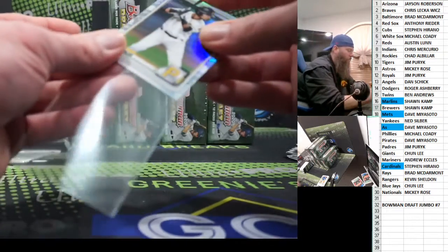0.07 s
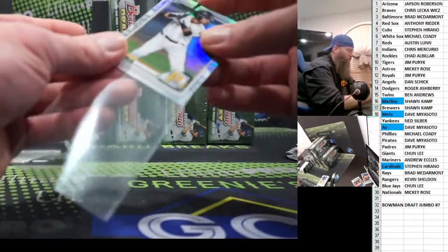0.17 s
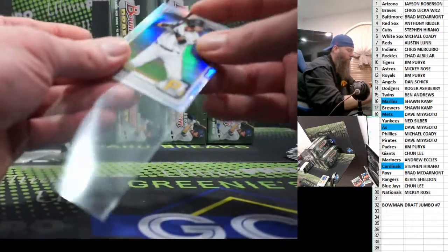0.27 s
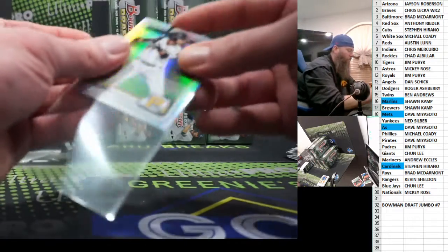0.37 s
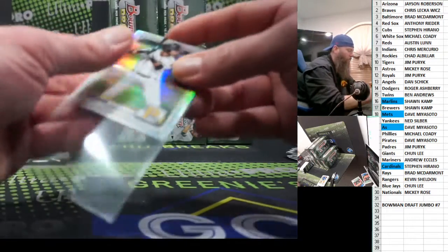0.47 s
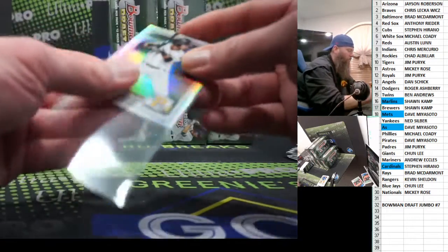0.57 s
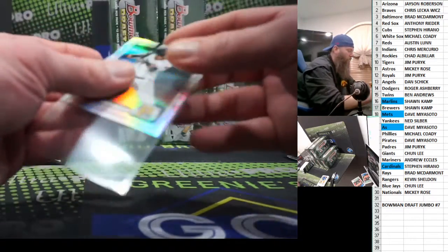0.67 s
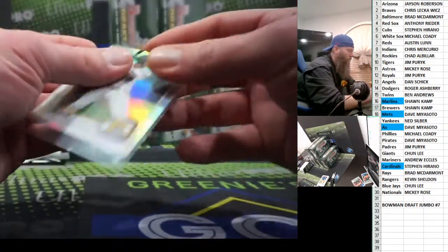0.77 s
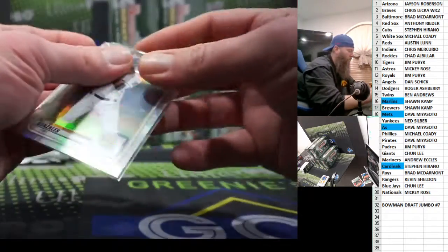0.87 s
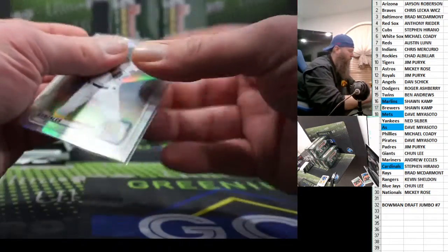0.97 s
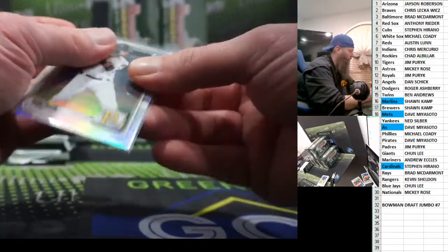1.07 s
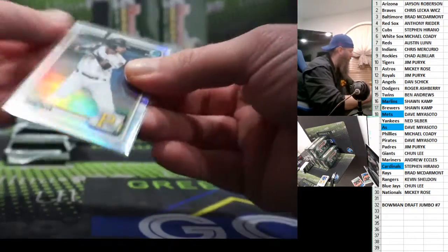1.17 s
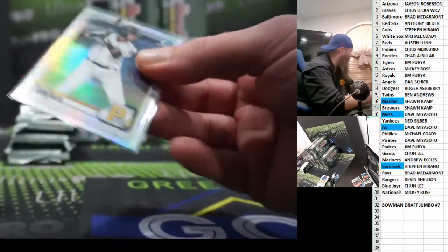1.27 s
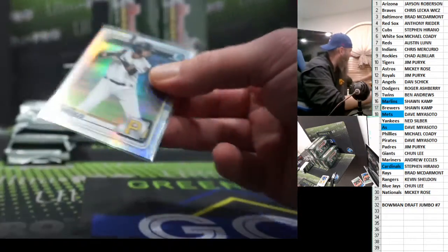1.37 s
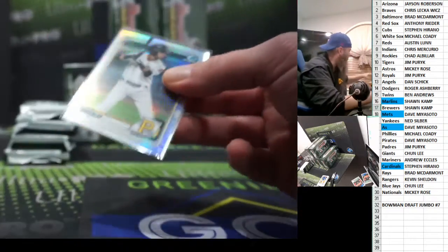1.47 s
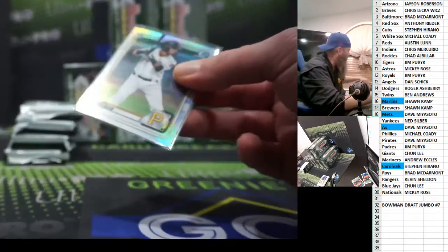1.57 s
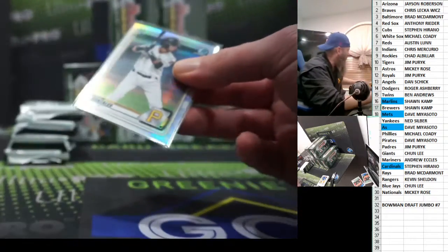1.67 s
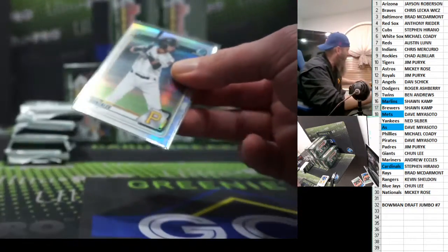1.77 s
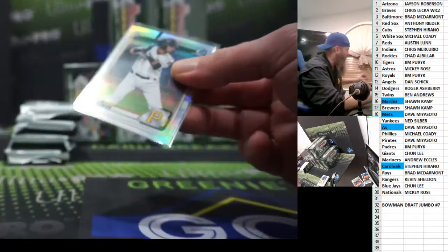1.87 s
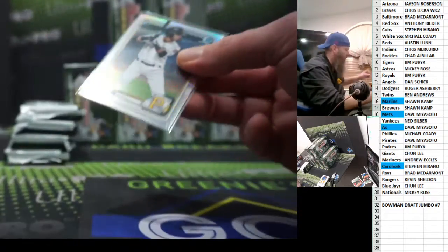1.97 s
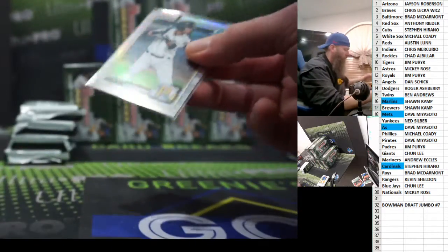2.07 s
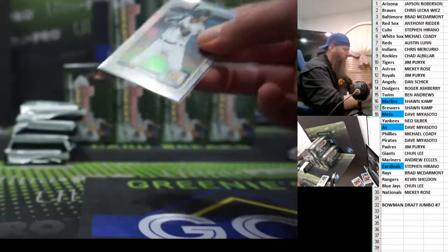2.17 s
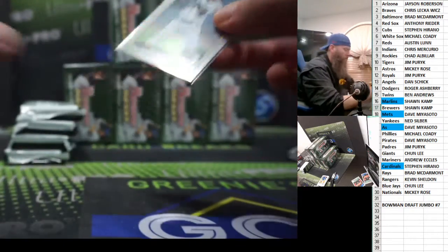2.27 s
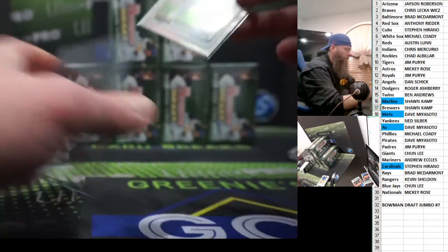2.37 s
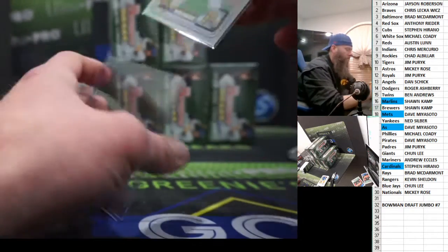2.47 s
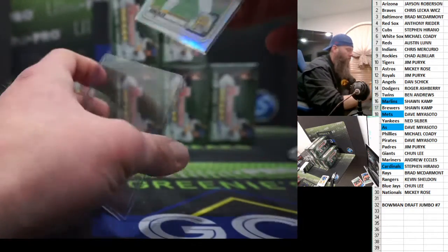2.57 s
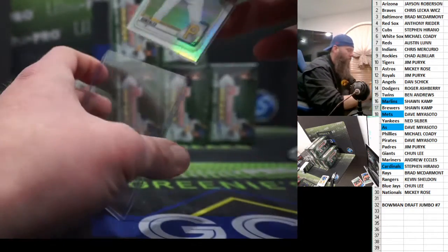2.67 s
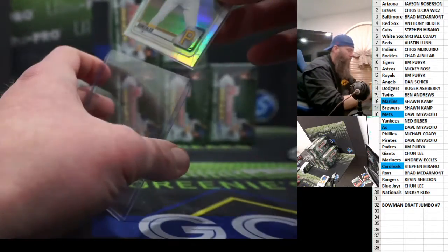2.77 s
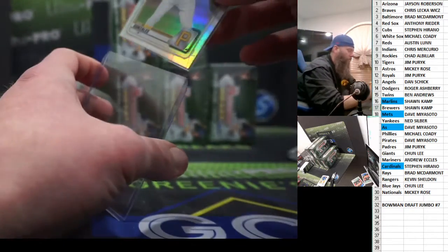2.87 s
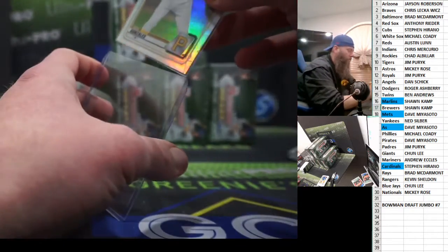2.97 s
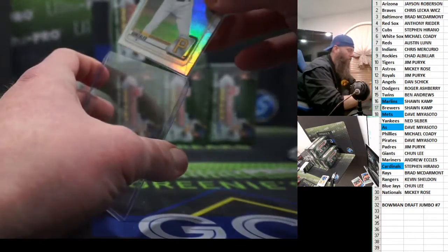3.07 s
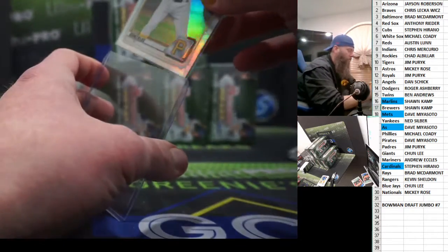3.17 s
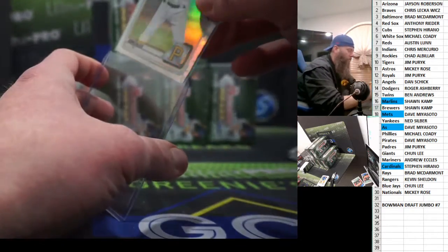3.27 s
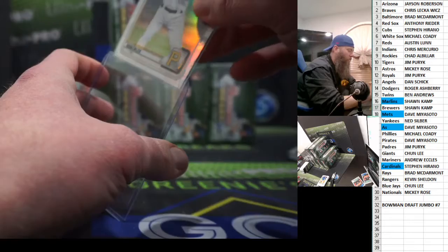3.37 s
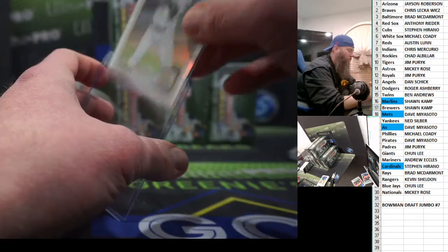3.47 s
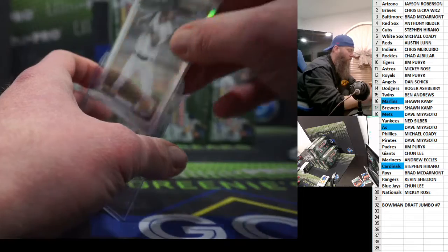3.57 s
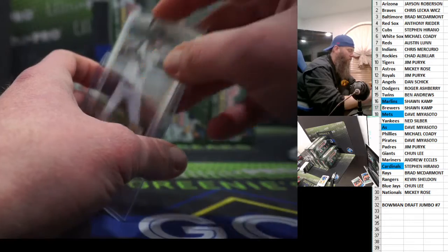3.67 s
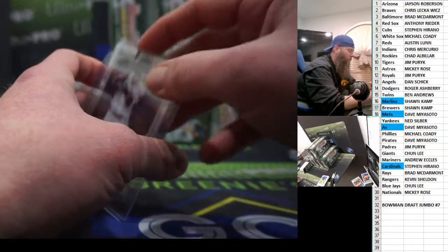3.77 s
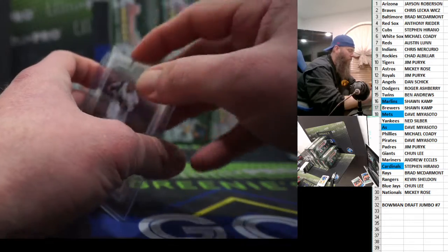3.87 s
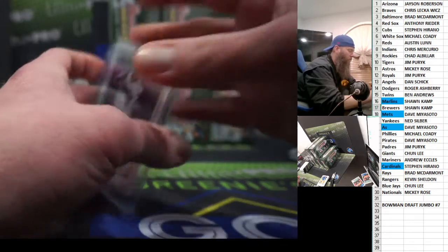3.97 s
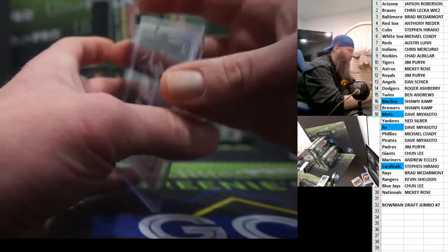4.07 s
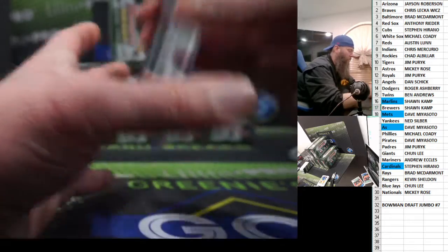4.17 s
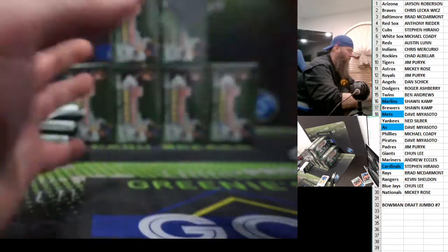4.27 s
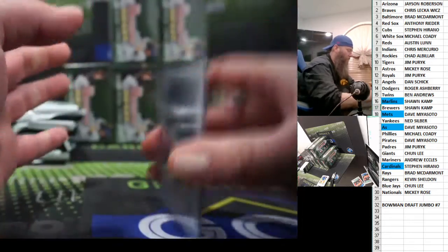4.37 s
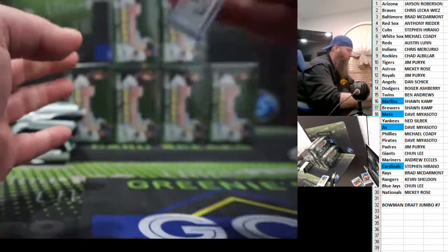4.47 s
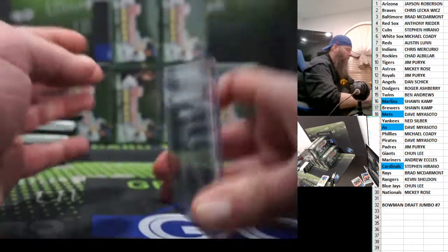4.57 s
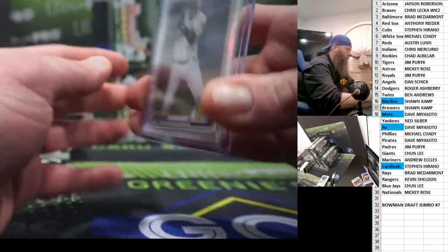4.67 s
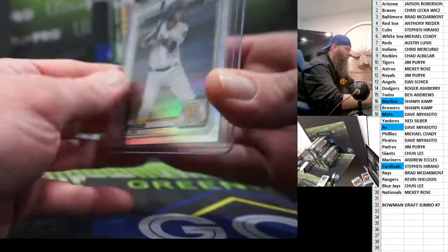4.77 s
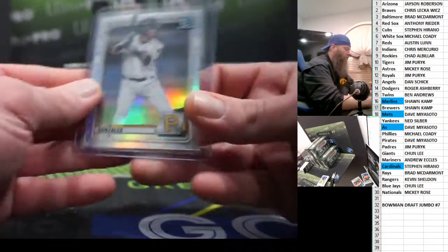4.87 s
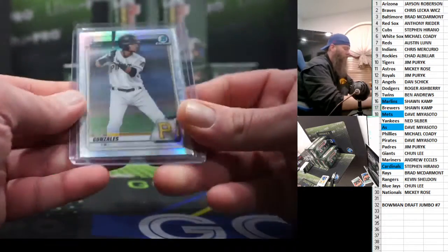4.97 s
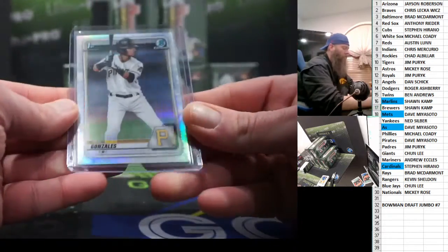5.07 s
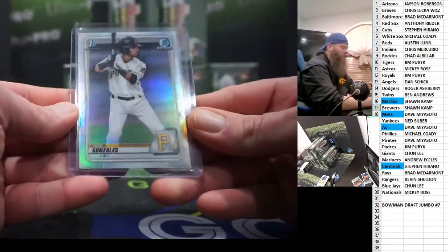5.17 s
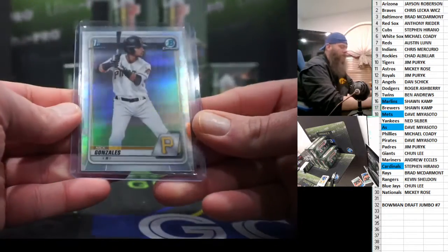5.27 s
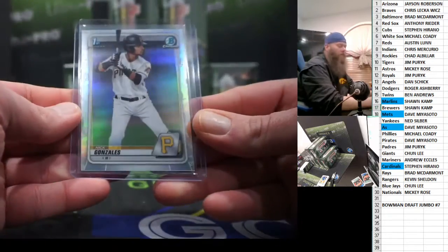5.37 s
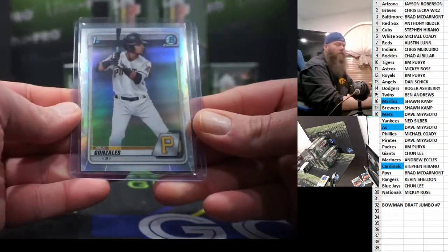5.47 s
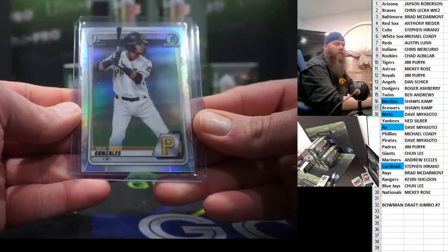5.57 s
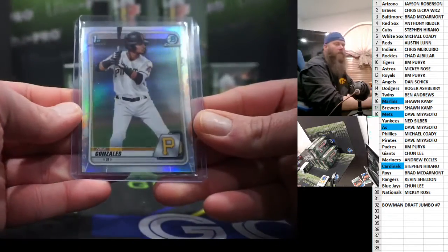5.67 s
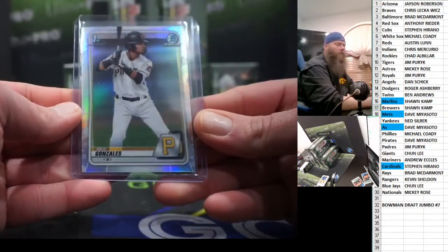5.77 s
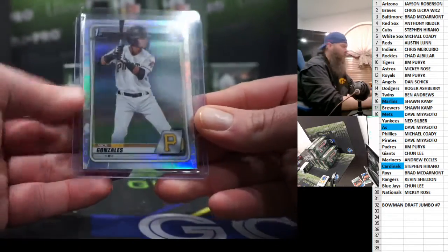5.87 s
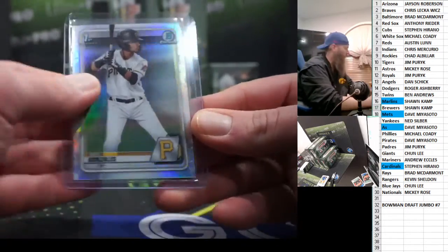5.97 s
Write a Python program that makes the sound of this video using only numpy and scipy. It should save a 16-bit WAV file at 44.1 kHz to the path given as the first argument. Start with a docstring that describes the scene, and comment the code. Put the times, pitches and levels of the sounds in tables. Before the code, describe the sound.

Close to a desk microphone in a small, quiet room, a trading card slides into a soft plastic sleeve with faint hisses and a couple of crisp little snaps. Fingers rub and bump the plastic, and a small click follows as the card goes into a rigid holder. The holder is then rapped twice in quick succession on a padded table, by far the loudest sound, ringing briefly in the room. Faint handling follows.

```python
"""Soft plastic film hisses and snaps as a trading card slides into a sleeve, then into a rigid holder,
close to a desk microphone in a small room. Fingers rub and bump the plastic. Then, loudest of all,
the holder's edge is rapped twice on the padded table to seat the card, and the room rings briefly.
Every movement shakes the microphone stand a little."""
import sys
import numpy as np
from scipy import signal
from scipy.fft import rfft, irfft, next_fast_len
from scipy.io import wavfile
from scipy.ndimage import uniform_filter1d

SR = 44100
rng = np.random.default_rng(int(sys.argv[2]) if len(sys.argv) > 2 else 0)


def unload_wav(signal):
    """Save mono or channel-first audio to the path in sys.argv[1] as 16-bit WAV at rate SR, clipped to [-1, 1]."""
    wavfile.write(
        sys.argv[1],
        SR,
        np.round(np.clip(np.atleast_2d(signal).T, -1, 1) * 32767).astype(np.int16),
    )


N = 264820
TIME = np.arange(N) / SR

# raps on the table, close to the microphone:
# (time [s], knock gain [dB], crack peak [dB], thud gain [dB], stand sway gain [dB])
RAPS = [(4.3359, 0.5, -21, -42, -26.5), (4.5415, 0.5, -20, -23, -19.5)]
# modes of the table and holder: (frequency [Hz], relative level [dB], t60 [s])
TABLE_MODES = [(477.3, -14, 0.022), (536, -20.5, 0.082), (638, -23, 0.0053), (770.7, -20, 0.14),
               (1060, -1.32, 0.0075), (1452, -17.5, 0.033), (1550, -15.5, 0.018), (2064, -30.5, 0.031)]
# the holder's plastic crack: (frequency [Hz], relative level [dB])
CRACK_SPECTRUM = [(1500, -13.5), (2250, -8), (2600, 5), (3000, 5.5), (3550, -3), (4150, 6), (4900, -0.5),
                  (5450, 4.5), (6200, -3.5), (8100, -2), (9900, -7), (11500, -13.5), (13000, -13),
                  (16000, -23.5)]
# reflections off surfaces beside the microphone: (delay [s], gain [dB])
NEAR_ECHOES = [(.0039, -8), (.00765, -13)]
def holder_raps(thud_hz=120, thud_t60=0.14, mat_hz=2200, crack_lag_s=0.00082, crack_t60=0.013,
                crack_echo_db=-8):
    """The holder's edge hits the mat: a dead knock, a thud and a crack, mirrored by near surfaces."""
    knock, crack = np.zeros(N), np.zeros(N)
    body = sum((-1) ** (k + 1) * from_db(db) * ring(hz, t60)
               for k, (hz, db, t60) in enumerate(TABLE_MODES))
    mat = signal.butter(4, mat_hz, fs=SR, output="sos")   # the mat softens the blow
    for s, knock_db, crack_db, thud_db, _ in RAPS:
        blow = from_db(knock_db) * body + from_db(thud_db) * ring(thud_hz, thud_t60)
        add(knock, s, signal.sosfilt(mat, blow))
        add(crack, s + crack_lag_s, from_db(crack_db) * click(crack_t60, CRACK_SPECTRUM))
    out = knock + crack
    for delay, db in NEAR_ECHOES:
        add(out, delay, -from_db(db) * (knock + from_db(crack_echo_db) * crack))
    return out


# snaps of the sleeve, close up: (time [s], peak level [dB], tilt [dB/octave])
FILM_SNAPS = [(0.2646, -48.5, -0.5), (0.8216, -45.5, 1.5), (0.8432, -36.5, 0), (.8522, -48, 8),
              (.919, -36, 1.9), (1.052, -56, -4), (1.655, -57.5, -4), (2.2889, -55, -5.5),
              (2.397, -57, -6.5), (2.441, -54.5, -5), (2.5626, -57.5, -7), (3.0918, -45, 0.5),
              (3.9235, -54, 1), (3.9314, -54, -7), (4.748, -50, 6), (5.967, -56, 0)]
# a snap before its tilt: (frequency [Hz], relative level [dB])
SNAP_SPECTRUM = [(400, -12), (1100, -11), (1600, -1), (2000, 2.5), (2450, -9.5), (3500, -6.5), (4400, 2.5),
                 (5300, 2), (6000, -3), (8100, 4.5), (11000, -4), (12800, -10.5), (16000, -2)]
def film_snaps(snap_t60=0.0091, shiver_t60=0.13, shiver_db=-14):
    """Card corners catch and the film snaps, then shivers on faintly."""
    out = np.zeros(N)
    for s, db, tilt in FILM_SNAPS:
        spectrum = [(hz, level + tilt * np.log2(hz / SR)) for hz, level in SNAP_SPECTRUM]
        snap = click(snap_t60, spectrum)
        shiver = from_db(shiver_db) * click(shiver_t60, spectrum)
        add(out, s, from_db(db) * (snap + shiver))
    return out


# pushes of the card, close up: (start [s], length [s], final level [dB], top treble gain [dB])
PUSHES = [(0.25, 0.085, -71, -1), (0.344, 0.075, -76, 4), (0.592, 0.21, -72, 3), (0.81, 0.059, -64, -3),
          (1.084, 0.11, -76, 8.5), (2.14, 0.066, -66.5, -3), (2.412, 0.041, -76, 7),
          (2.524, 0.045, -73.5, -8), (2.623, 0.061, -80.5, 1), (2.749, 0.027, -76.5, 0.5),
          (2.8, .025, -80, -2), (2.852, 0.047, -85, 5), (3.13, 0.1, -76.5, -14), (3.382, 0.15, -71.5, 2.5),
          (3.521, 0.3, -67, 3), (3.953, 0.06, -70, -3), (4.76, .22, -79.5, -12), (5.148, 0.089, -81, -2.5),
          (5.899, 0.1, -70, -3)]
# card sliding on film: (frequency [Hz], relative level [dB])
SLIDE_SPECTRUM = [(900, -18), (1500, -10), (2000, -5), (2600, -9.5), (3600, -10.5), (4400, -1.5),
                  (6100, -5), (8100, -1.5), (10600, -7), (14500, -6), (16000, -2)]
def card_slide(crossover_hz=9500):
    """Each push makes the card hiss along the film; each push has its own share of high treble."""
    speed, sheen = np.zeros(N), np.zeros(N)
    for start, length, db, treble_db in PUSHES:
        stroke = from_db(db) * push(start, length)
        speed += stroke
        sheen += stroke * from_db(treble_db)
    out = np.zeros(N)
    for envelope, side in ((speed, "low"), (sheen, "high")):
        crossover = signal.butter(2, crossover_hz, side, fs=SR, output="sos")
        hiss = friction(SLIDE_SPECTRUM, grain_db=3.5, flutter_db=2.0)
        out += envelope * signal.sosfilt(crossover, hiss)
    return out


def push(start, length, attack_s=0.0066, ease_share=.3, swell_db_per_s=30, release_s=0.016):
    """Envelope of a push that takes hold, gathers speed and lets go; longer ones start more gently."""
    since, past = TIME - start, TIME - start - length
    attack = np.clip(since / (attack_s + ease_share * length), 0, 1)
    swell = from_db(swell_db_per_s * np.minimum(past, 0))
    return attack * swell * np.exp(-np.clip(past / release_s, 0, 20))


def pocket(hiss, round_trip_s=.00023, reflection=0.31, wander=0.19):
    """The gap between the sheets resonates, its pitch wandering at random."""
    lag = round_trip_s * np.exp(wander * drift(10.0))
    return (hiss + reflection * np.interp(TIME - lag, TIME, hiss)) / np.hypot(1, reflection)


# bumps at the desk, near the microphone: (time [s], peak level [dB], frequency [Hz])
HAND_BUMPS = [(0.844, -53, 1260), (.848, -64, 131), (0.859, -47, 52), (1.044, -54, 163), (1.05, -52, 75.5),
              (1.051, -67, 786), (1.098, -63.5, 480), (1.569, -61.5, 547), (1.653, -69, 480),
              (2.074, -58, 680), (2.075, -53, 1060), (2.315, -62.5, 480), (3.093, -63.5, 405),
              (3.092, -53, 884), (3.78, -63.5, 1110), (5.921, -62, 900)]
def bumps(t60_cycles=13):
    """Fingers and card edges bump the plastic, and hands bump the table."""
    return touches([(s, db, hz, t60_cycles / hz) for s, db, hz in HAND_BUMPS], octaves=0.67)


# squeaks and ticks, close up: (time [s], peak level [dB], frequency [Hz], t60 [s])
PLASTIC_SQUEAKS = [(1.7965, -61, 3400, 0.15), (3.092, -41, 13000, 0.009), (3.8, -66, 1820, .07),
                   (4.059, -60, 1810, 0.017), (4.06, -65.5, 8000, .05), (4.097, -64.5, 1800, 0.043),
                   (4.768, -63.5, 5750, 0.04), (4.796, -60, 5700, 0.035), (4.8, -63.5, 7760, 0.049),
                   (5.6457, -76, 4610, 0.021)]
def squeaks():
    """The plastic sticks and slips in short squeaks and high ticks."""
    return touches(PLASTIC_SQUEAKS, octaves=0.29)


# grip while sleeving, seating and showing the card: (time [s], firmness [dB])
SLEEVING_GRIP = [(0.0, -85.5), (0.77, -84.5), (0.96, -80), (1.49, -81.5), (2.0, -82), (2.23, -77.5),
                 (2.37, -78.5), (2.53, -80.5), (2.72, -83.5), (3.28, -86), (3.89, -82)]
SEATING_GRIP = [(3.98, -80), (4.13, -79.5), (4.3, -77)]
SHOWING_GRIP = [(5.0, -80), (5.11, -83), (5.816, -86.5), (5.98, -76.5)]
def grip(db, follows, light_grip_db=-80.5):
    """Gain of a layer: `db` at a light grip, rising `follows` dB for each dB of firmer grip."""
    times, firmness = np.vstack([SLEEVING_GRIP, SEATING_GRIP, SHOWING_GRIP]).T
    return from_db(db + follows * (np.interp(TIME, times, firmness) - light_grip_db))


# skin on plastic, close up: (frequency [Hz], relative level [dB])
RUB_SPECTRUM = [(120, -9.5), (200, -4.5), (440, 1), (750, -3), (1250, 5), (1700, -5.5), (2100, -2),
                (2700, -10), (4900, -16), (8000, -15.5), (11000, -31.5)]
def finger_rub():
    """Fingertips rub the outside of the plastic, louder under a firm grip."""
    return grip(db=-79, follows=1.5) * friction(RUB_SPECTRUM, grain_db=3.0, flutter_db=2.0)


# film flexing in the hand, close up: (frequency [Hz], relative level [dB])
FLEX_SPECTRUM = [(1500, -10.5), (3000, -3.5), (4500, -2), (8000, -5), (11000, -7), (16000, -10)]
def film_rustle():
    """The grip flexes the film into a fine rustle."""
    return grip(db=-82.5, follows=2.2) * friction(FLEX_SPECTRUM, grain_db=2.5, flutter_db=3.0)


def film_crinkles(per_s=14, spread_db=3, t60=.006):
    """The film clicks at random under the fingers, louder under a firm grip."""
    sizes = from_db(spread_db * np.minimum(rng.exponential(1, N), 3))
    impulses = sizes * (rng.random(N) < per_s / SR) * grip(db=-71.5, follows=2.2)
    return signal.fftconvolve(impulses, click(t60, FLEX_SPECTRUM))[:N]


# the hands jolt the microphone stand: (time [s], sway gain [dB])
STAND_JOLTS = [(.79, -42), (1.01, -27.5), (3.9, -40.5), (5.72, -37.5)]
# handling felt through the stand: (frequency [Hz], relative level [dB])
RUMBLE_SPECTRUM = [(12, 6), (20, 6), (30, -16.5), (45, -22), (70, -43), (120, -48), (250, -74)]
def microphone_stand(sway_hz=20.0, sway_t60=0.99, sway_lag_s=.02, build_up_s=.04):
    """The stand rumbles with the handling and swings after each jolt and rap."""
    rumble = colour(band(rng.standard_normal(N), 15, 300), RUMBLE_SPECTRUM)
    out = grip(db=-50, follows=1.1) * rms_one(rumble)
    build_up = 1 - np.exp(-(TIME[:SR] / build_up_s) ** 2)
    swing = ring(sway_hz, sway_t60, size=SR) * build_up
    for s, *_, sway_db in STAND_JOLTS + RAPS:
        add(out, s + sway_lag_s, -from_db(sway_db) * swing)
    return out


# the small room's tail, heard from the desk: (frequency [Hz], relative level [dB], t60 [s])
ROOM_BANDS = [(71.5, -11, .35), (120, -13.5, 0.34), (157.7, -8, 0.3), (286, -4.5, 0.33), (480, -13, 0.42),
              (680, -9, 0.4), (900, -19, 0.47), (1300, -5, 0.4), (1593, -10.5, 0.38), (2080, -7, 0.4),
              (2920, -13, 0.3305), (3856, -12.5, 0.4), (8000, -13, .3), (15000, -14, .2)]
def room_tail(x, gap_s=.007, build_up_s=0.0035):
    """Diffuse echoes build up after a short gap, fade evenly and die faster in the treble."""
    size = SR // 2
    hz = np.fft.rfftfreq(size, 1 / SR)
    white = np.exp(2j * np.pi * rng.random(len(hz)))   # flat spectrum, random phases
    build_up = np.clip((TIME[:size] - gap_s) / build_up_s, 0, 1)
    response = np.zeros(size)
    for centre_hz, db, t60 in ROOM_BANDS:
        share = at_hz([(f, f == centre_hz) for f, *_ in ROOM_BANDS], hz)   # triangular band
        echoes = irfft(white * share, size)
        power = uniform_filter1d(echoes ** 2, size=SR // 50, mode="wrap")
        echoes *= np.sqrt(power.mean() / power)   # a cluttered room: no reflection stands out
        response += from_db(db) * echoes * rms_one(dying(t60) * build_up)
    return signal.fftconvolve(x, response)[:N]


# reflections off the walls, farther from the microphone: (delay [s], gain [dB])
WALL_ECHOES = [(.0208, -19.5), (0.0305, -18.5)]
def wall_echoes(raps):
    """The walls throw each rap back as two distinct echoes."""
    out = np.zeros(N)
    for delay, db in WALL_ECHOES:
        add(out, delay, from_db(db) * raps)
    return out


# the strongest room modes at the desk: (frequency [Hz], relative level [dB])
ROOM_MODES = [(123.8, -49), (376.8, -48.5), (694.4, -54.5), (850.6, -48), (1104, -47.5), (1147, -43.5),
              (1238, -47.5), (1405, -51.5), (1491, -52.5), (1658, -55.5), (1830, -60.5), (1900, -60.5)]
def standing_waves(gain_db=4.5, t60=.33, min_lag_s=.012):
    """Each rap sets a few room modes ringing above the tail."""
    out = np.zeros(N)
    for hz, db in ROOM_MODES:
        lag = min_lag_s * (1 + rng.random())
        for s, knock_db, *_ in RAPS:
            add(out, s + lag, from_db(gain_db + db + knock_db) * ring(hz, t60))
    return out


# noise floor at the microphone: (frequency [Hz], relative level [dB])
ROOM_TONE_SPECTRUM = [(70, -7), (120, -6.5), (170, -13.5), (250, -12), (380, -28), (800, -26.5),
                      (1000, -23.5), (1250, -23.5), (1550, -26), (2100, -28.5), (2800, -34), (4700, -37.5),
                      (16000, -43.5)]
def room_tone(db=-80):
    """The still room and the microphone's own hiss lie under everything."""
    return from_db(db) * rms_one(colour(rng.standard_normal(N), ROOM_TONE_SPECTRUM))


def touches(rows, octaves):
    """Small contacts, each exciting one damped resonance `octaves` wide."""
    out = np.zeros(N)
    half_width = 2 ** (octaves / 2)
    for s, db, hz, t60 in rows:
        resonance = band(burst(t60), hz / half_width, hz * half_width)
        add(out, s, from_db(db) * peak_one(resonance))
    return out


def friction(spectrum, grain_db, flutter_db):
    """Countless micro-slips of uneven size, under a pressure that wavers."""
    slips = rng.standard_normal(N) * from_db(grain_db * np.minimum(rng.exponential(1, N), 6))
    pressure = from_db(flutter_db * drift(53))
    return rms_one(colour(slips * pressure, spectrum))


def click(t60, spectrum):
    """A coloured burst of unit peak."""
    return peak_one(colour(burst(t60), spectrum))


def burst(t60):
    """A dying cluster of tiny contacts that favours no frequency."""
    spectrum = rfft(rng.standard_normal(SR) * dying(t60, size=SR))
    return irfft(spectrum / np.abs(spectrum), SR)[:SR // 2]


def ring(hz, t60, size=SR // 2):
    """One struck mode."""
    return np.sin(2 * np.pi * hz * TIME[:size]) * dying(t60, size)


def dying(t60, size=SR // 2):
    """Envelope that falls 60 dB in t60 seconds."""
    return np.exp(-np.minimum(np.log(1000) * TIME[:size] / t60, 60))


def drift(knots_per_s):
    """Slow wander between random values of spread 1."""
    knots = rng.standard_normal(4096)
    return np.interp(TIME * knots_per_s, np.arange(len(knots)), knots)


def colour(x, spectrum):
    """Causal (minimum-phase) filter with the given spectrum."""
    size = next_fast_len(len(x) // 2 + 2048) * 2
    hz = np.arange(size // 2 + 1) * SR / size
    cepstrum = irfft(np.log(from_db(at_hz(spectrum, hz))))
    cepstrum[1:size // 2] *= 2
    cepstrum[size // 2 + 1:] = 0
    return irfft(rfft(x, size) * np.exp(rfft(cepstrum)))[:len(x)]


def band(x, low_hz, high_hz):
    """Second-order band-pass."""
    edges = [low_hz, min(high_hz, SR / 2 - 1000)]
    return signal.sosfilt(signal.butter(2, edges, "band", fs=SR, output="sos"), x)


def at_hz(rows, hz):
    """Read a table on a log-frequency axis."""
    frequencies, values = np.transpose(rows)
    return np.interp(np.log(np.maximum(hz, 1)), np.log(frequencies), values)


def add(out, s, sound):
    """Mix a sound in at s seconds."""
    i = int(s * SR)
    out[i:i + len(sound)] += sound[:N - i]


def from_db(db):
    """Decibels to gain."""
    return 10 ** (np.asarray(db) / 20)


def rms_one(x):
    """Scale to unit power."""
    return x / np.sqrt(np.mean(x ** 2) + 1e-30)


def peak_one(x):
    """Scale to unit peak."""
    return x / np.abs(x).max()


def scene():
    """One desk microphone: the handling is close to it, and the raps fill the room behind."""
    raps = holder_raps()
    contacts = bumps() + film_snaps() + squeaks()
    hiss = card_slide() + film_rustle()
    handling = contacts + finger_rub() + pocket(hiss) + film_crinkles()
    air = room_tone()
    into_room = from_db(-1.0) * raps + from_db(-1.04) * handling
    echoes = room_tail(into_room) + wall_echoes(raps) + standing_waves()
    return (raps + handling + echoes + microphone_stand() + air)[None]


def record(dry, cutoff_hz=15900):
    """The highest treble is cut steeply."""
    return signal.sosfilt(signal.ellip(10, .1, 80, cutoff_hz, fs=SR, output="sos"), dry)


dry = scene()
out = record(dry)
unload_wav(out)
```